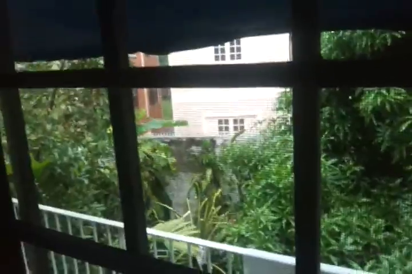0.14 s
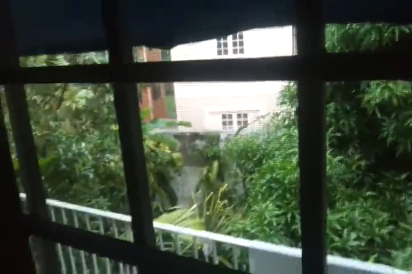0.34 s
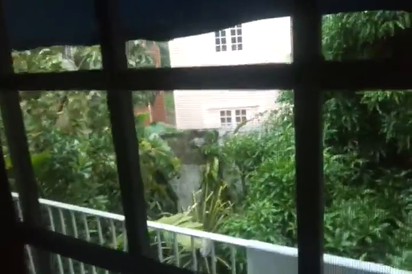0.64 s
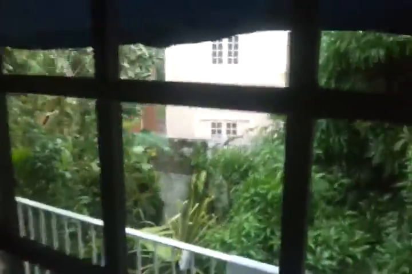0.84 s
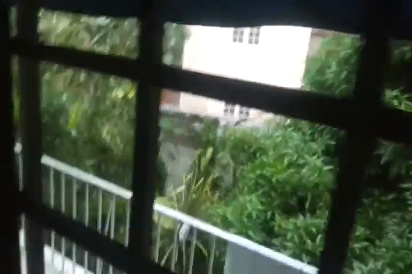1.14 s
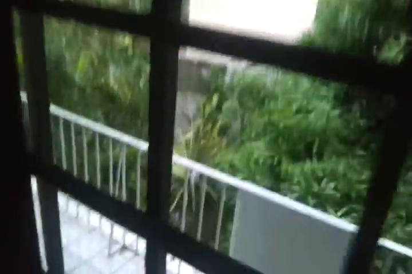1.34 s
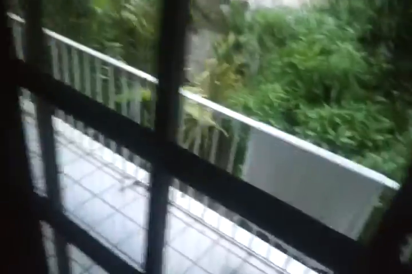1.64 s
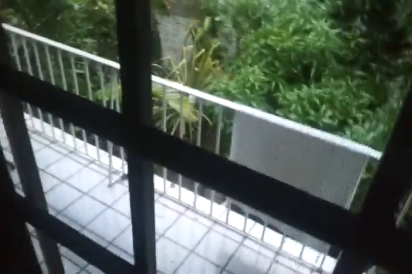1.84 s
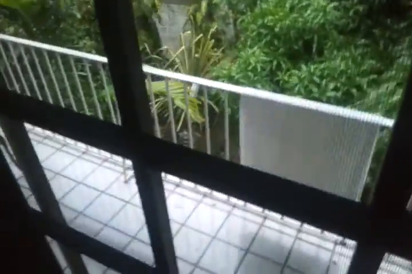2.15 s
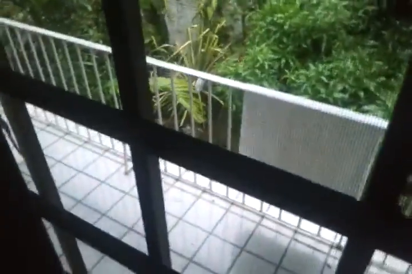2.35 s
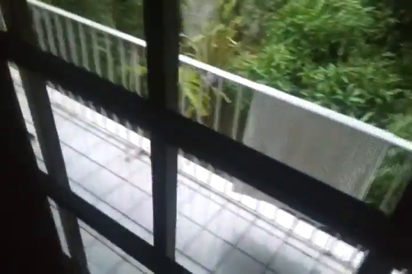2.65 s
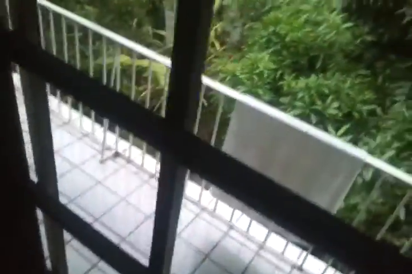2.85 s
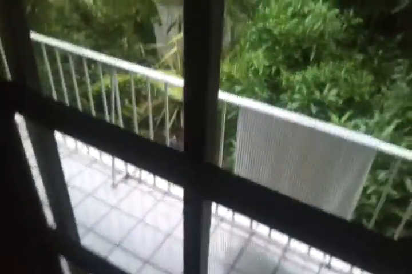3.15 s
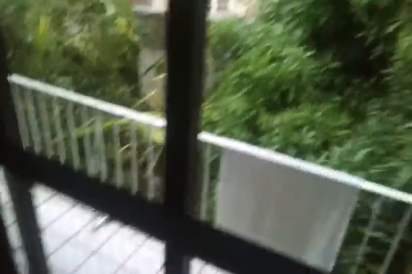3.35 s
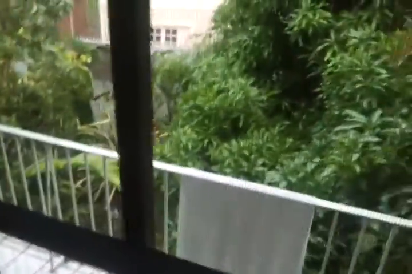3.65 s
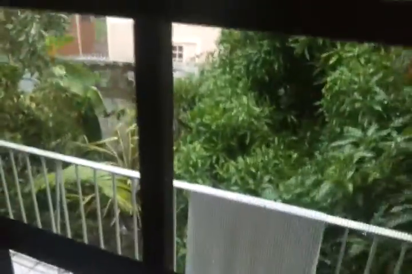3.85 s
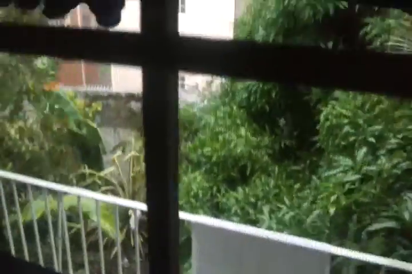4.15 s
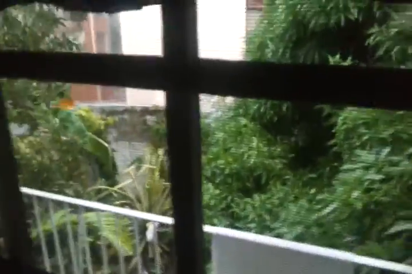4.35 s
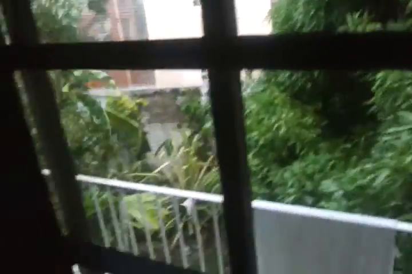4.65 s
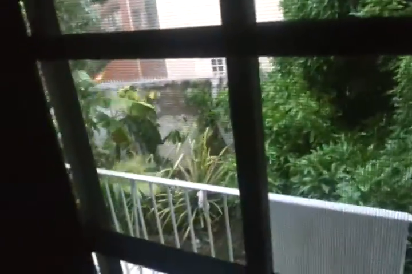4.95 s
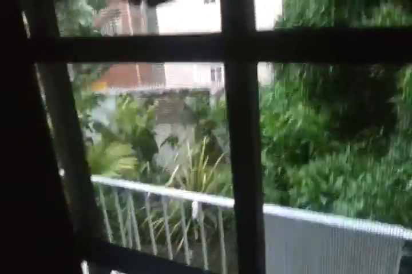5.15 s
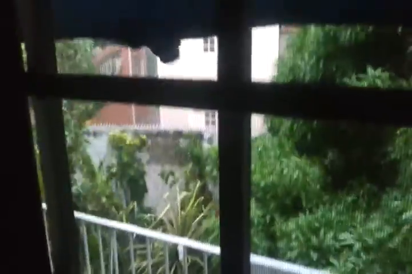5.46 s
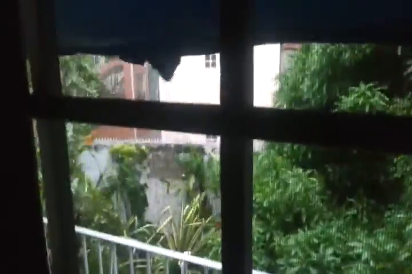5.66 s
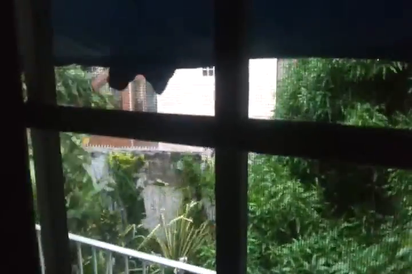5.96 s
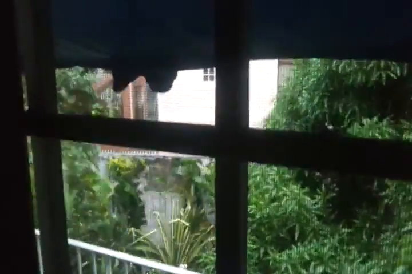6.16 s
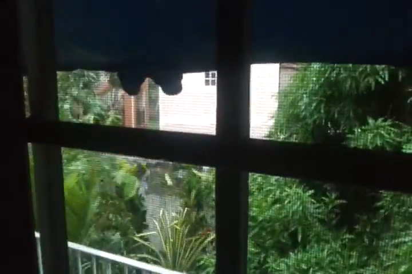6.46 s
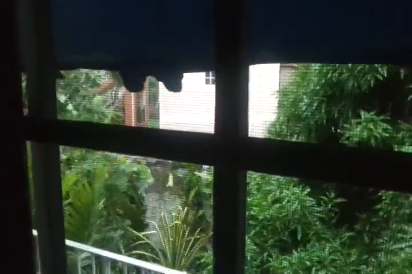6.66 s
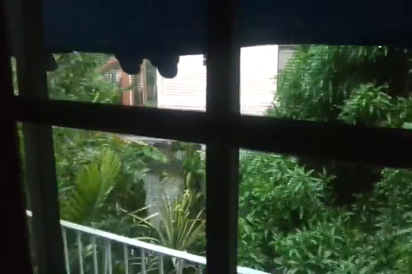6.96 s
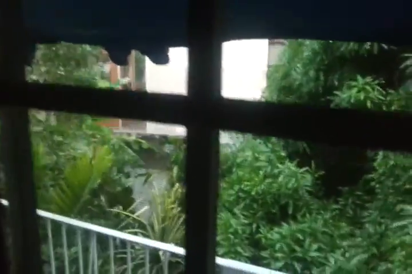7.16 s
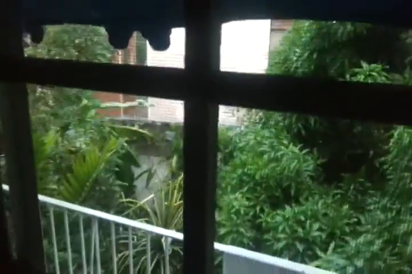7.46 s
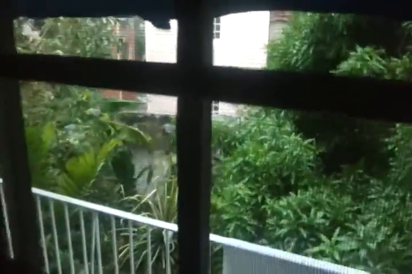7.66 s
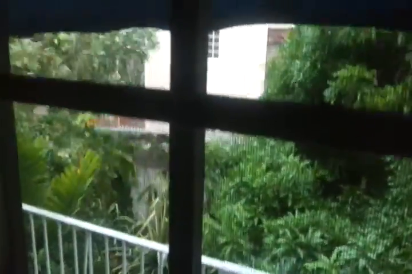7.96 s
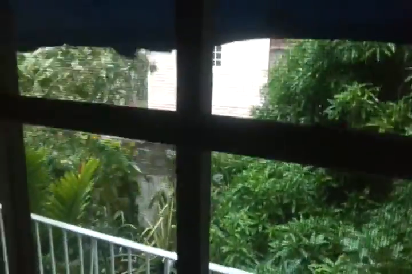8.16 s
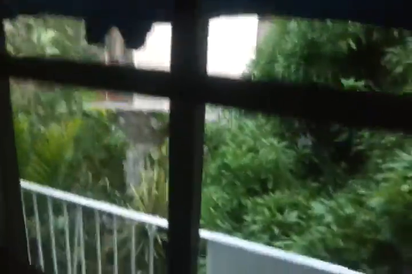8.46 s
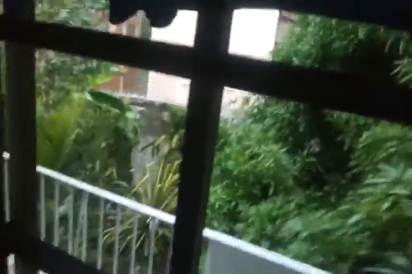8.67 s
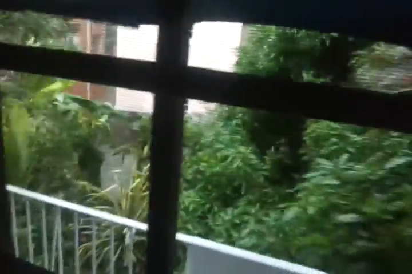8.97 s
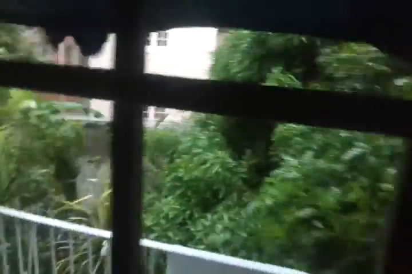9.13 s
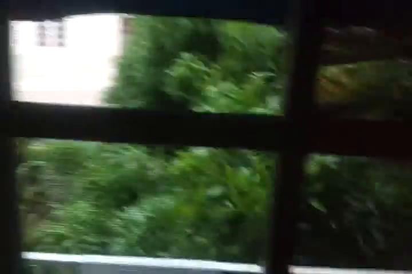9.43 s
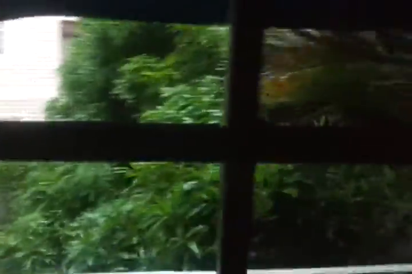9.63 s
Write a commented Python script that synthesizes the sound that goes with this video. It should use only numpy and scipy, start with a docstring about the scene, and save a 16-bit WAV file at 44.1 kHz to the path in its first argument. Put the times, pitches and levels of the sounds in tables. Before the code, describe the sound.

A rainstorm rushes loudly in the trees, swelling and ebbing as low wind buffets hit the microphone and briefly overload it.

```python
"""A storm heard through a barred window: wind roars in the trees and drives hissing sheets of rain.
About 1 s in, the first gusts thud on the microphone; it tilts down to the balcony, and nearby
reflections recolour the rush. The storm swells to a peak after 4 s and ebbs. Around 6 s the hardest
gusts buffet the microphone into overload; the storm rises again and more buffets follow near 8.6 s.
At the end the microphone swings back and the opening colour returns."""
import sys
import numpy as np
from scipy import signal
from scipy.io import wavfile
from scipy.ndimage import uniform_filter1d

SR = 44100
rng = np.random.default_rng(int(sys.argv[2]) if len(sys.argv) > 2 else 0)


def output_pcm(signal):
    """Save a mono or channel-first signal as 16-bit PCM at the path in sys.argv[1].

    Samples are clipped to [-1, 1] before scaling.
    """
    pcm = np.clip(np.atleast_2d(signal).T, -1, 1) * 32767
    wavfile.write(sys.argv[1], SR, np.round(pcm).astype(np.int16))


N = 432180
HOP = 256  # samples between short-time spectra

# Strength of the storm in the trees and the rain: time_s, roar_db, hiss_db
STORM_LEVELS = [(0.05, -31.5, -25.5), (0.18, -30, -24), (0.86, -30.5, -24), (1.21, -32, -27),
                (1.97, -29.5, -23.5), (2.64, -30.5, -24), (2.97, -26.5, -20.5), (3.83, -26.5, -20.5),
                (4.26, -22, -18), (4.53, -25.5, -18), (6.07, -33.5, -28), (6.15, -31.5, -27.5),
                (6.59, -32, -25), (7.58, -26.5, -20), (8.07, -29.5, -24), (8.56, -27, -23),
                (9.18, -26, -19.5), (9.75, -29, -23)]


def gain_of(db):
    """Amplitude ratio of a level in decibels."""
    return 10 ** (np.asarray(db) / 20)


def unit_rms(x):
    """Normalisation to an rms of 1."""
    return x / np.sqrt(np.mean(x ** 2) + 1e-20)


def spectrum_db(points, hz):
    """Interpolation of a spectrum on a logarithmic frequency axis."""
    points_hz, db = np.transpose(points)
    return np.interp(np.log(hz + 1), np.log(points_hz + 1), db)


def follow(table, t):
    """Linear interpolation of a table's columns at the times t."""
    time_s, *columns = np.transpose(table)
    return [np.interp(t, time_s, column) for column in columns]


def add(mix, start_s, sound):
    """Superposition of a sound on the mix."""
    part = mix[max(round(start_s * SR), 0):][:len(sound)]
    part += sound[:len(part)]


def low_pass(x, hz):
    """Steep band limiting by a windowed-sinc filter."""
    return signal.oaconvolve(x, signal.firwin(601, hz, window=("kaiser", 9), fs=SR), "same")


def grid():
    """Times (a column) and frequencies (a row) of the short-time spectra."""
    return np.arange(N // HOP + 5)[:, None] * HOP / SR, np.fft.rfftfreq(4 * HOP, 1 / SR)


def turbulent_noise(colour_db, level_db, band_hz, patchy_db):
    """Random-phase noise with drifting patches; level_db sets its level within band_hz."""
    t, hz = grid()
    real, imaginary, patches = rng.standard_normal((3, len(t), len(hz)))
    patches = uniform_filter1d(patches, size=16, axis=0)
    patches = unit_rms(uniform_filter1d(patches, size=10, axis=1))
    shape = gain_of(colour_db) * np.ones_like(t)
    in_band = (hz >= band_hz[0]) & (hz <= band_hz[1])
    shape /= np.sqrt((shape[:, in_band] ** 2).sum(axis=1, keepdims=True))
    spectra = (real + 1j * imaginary) * shape * gain_of(level_db + patchy_db * patches)
    return np.sqrt(3 / 2) * signal.istft(spectra.T, nperseg=4 * HOP, noverlap=3 * HOP)[1][:N]


def reflections_db(t, hz):
    """Interference: nearby reflections lift and cancel bands that slide as the microphone turns."""
    # Effect of the microphone's direction on the bands: time_s, frequency_ratio, strength_ratio
    facing = [(0, 0.98, 1), (.85, 0.97, 1), (1.15, 0.86, 0.6), (1.4, 0.63, 0.2), (2.6, 0.62, 0.5),
              (3.3, 0.69, 0.2), (3.9, 0.79, 0.1), (9.35, 0.95, 0.06), (9.65, 0.94, 0.84), (9.8, 0.99, 1)]
    # Interference peaks and dips: centre_hz, width_hz, gain_db
    bands = [(610, 140, 3), (1050, 220, -1.5), (2000, 265, 6), (2860, 270, -2.5), (5400, 520, 4.5)]
    shift, strength = follow(facing, t)
    return strength * sum(db * np.exp(-((hz / shift - centre) / width) ** 2 / 2)
                          for centre, width, db in bands)


def trees():
    """Turbulent flow through foliage radiates a broadband roar."""
    # Spectrum of the roar: frequency_hz, relative_density_db
    roar_spectrum = [(20, -19), (70, -5.5), (180, 4), (270, -0.5), (380, 3.5), (520, -3.5), (660, -2.5),
                     (820, 0.9), (1200, -0.7), (1550, 0), (2100, -6.5), (3000, -12), (5000, -20.5),
                     (8000, -49)]
    t, hz = grid()
    roar_db, _ = follow(STORM_LEVELS, t)
    colour_db = spectrum_db(roar_spectrum, hz) + reflections_db(t, hz)
    return turbulent_noise(colour_db, roar_db, band_hz=(800, 1700), patchy_db=0.46)


def far_rain():
    """Incoherent summation: countless far impacts on thrashing leaves merge into a hiss."""
    # Spectrum of the hiss: frequency_hz, relative_density_db
    hiss_spectrum = [(300, -25), (1900, -16), (2400, -10), (2900, -7), (3480, -3.5), (3680, -5),
                     (4050, -1.5), (4340, 0), (5000, -3), (5650, -8), (6300, -14), (6900, -21.5),
                     (7400, -30.5), (7700, -47.5)]
    t, hz = grid()
    _, hiss_db = follow(STORM_LEVELS, t)
    colour_db = spectrum_db(hiss_spectrum, hz) + reflections_db(t, hz)
    return turbulent_noise(colour_db, hiss_db, band_hz=(3000, 7000), patchy_db=0.4)


def near_drops(drops_per_s=500, share_db=-14, spread_db=3, ring_s=0.0009, pitch_count=24):
    """Impact excitation: each drop on the tiles or railing starts a brief damped oscillation."""
    t = np.arange(256) / SR
    when, which, size = rng.random((int(drops_per_s * N / SR), 3)).T
    pitch_hz = np.geomspace(2600, 5600, pitch_count)[(which * pitch_count).astype(int)]
    amplitudes = gain_of(spread_db * np.minimum(-np.log(1 - size), 4))
    ticks = amplitudes[:, None] * np.exp(-t / ring_s) * np.sin(2 * np.pi * pitch_hz[:, None] * t)
    places = (when * N).astype(int)[:, None] + np.arange(len(t))
    patter = np.bincount(places.ravel(), ticks.ravel(), N)[:N]
    _, hiss_db = follow(STORM_LEVELS, np.arange(N) / SR)
    return unit_rms(patter) * gain_of(hiss_db + share_db)


def gusts_db(t, rise_s=0.028, fall_s=0.03):
    """Gusts rise exponentially, hold and decay; where they overlap their powers add."""
    # Gusts that reach the microphone: start_s, length_s, level_db
    gusts = [(0.77, 0.36, -25.5), (1.258, 0.094, -22.5), (2.7, 0.6, -29), (4.139, 0.07, -19.5),
             (4.28, 0.11, -24), (4.663, 0.28, -28), (5.917, 0.18, -14), (6.141, 0.06, -13),
             (6.25, 0.16, -16), (6.484, 0.065, -19), (6.632, 0.092, -16), (6.818, 0.21, -20),
             (7.13, 0.11, -21), (8.16, 0.065, -24), (8.54, 0.37, -20), (8.645, 0.055, -12),
             (9.3, 0.22, -28.5)]
    power = 1e-9
    for start_s, length_s, db in gusts:
        before = np.maximum(start_s - t, 0) / rise_s
        after = np.maximum(t - start_s - length_s, 0) / fall_s
        power += (gain_of(db) * np.exp(-before - after)) ** 2
    return 10 * np.log10(power)


def airflow(t, draught_db=-32.5, lull_db=-29, calm_db=-32, hard_db=-13.5):
    """Power sum of the gusts and a draught that follows the trees: level in dB, air speed 0 to 1."""
    roar_db, _ = follow(STORM_LEVELS, t)
    light_db = draught_db + 0.93 * (roar_db - lull_db)
    level_db = 20 * np.log10(np.hypot(gain_of(light_db), gain_of(gusts_db(t))))
    return level_db, np.clip((level_db - calm_db) / (hard_db - calm_db), 0, 1)


def wind_rumble(trim_db=-1.5, brighten_db=0.5, knee_hz=200):
    """Eddy shedding at the microphone: faster air sheds smaller eddies, so the rumble reaches higher."""
    # Spectrum of the eddy pressure: frequency_hz, relative_density_db
    eddy_spectrum = [(10, -21), (25, -8.5), (50, -1.5), (90, 1), (170, -2.5), (260, -10), (400, -15.5),
                     (700, -32), (1500, -48), (4000, -79.5)]
    t, hz = grid()
    level_db, speed = airflow(t)
    octaves_up = np.log2(1 + (hz / knee_hz) ** 2) / 2
    colour_db = spectrum_db(eddy_spectrum, hz) + brighten_db * (speed - 0.5) * np.minimum(octaves_up, 2)
    return turbulent_noise(colour_db, level_db + trim_db, band_hz=(20, 250), patchy_db=2.0)


def eddy_pulse(time_s, level_db, pitch_hz, width_cycles=0.37, grit=0.29):
    """A large eddy's pressure shoves the diaphragm to and fro; fast air adds fine turbulence."""
    t = np.arange(-1024, 1024) / SR
    _, speed = airflow(time_s)
    swell = np.exp(-(t * pitch_hz / width_cycles) ** 2 / 2)
    shove = np.sin(2 * np.pi * (pitch_hz * t + rng.random()))
    eddy_band = signal.butter(2, [300, 750], "band", fs=SR, output="sos")
    small_eddies = unit_rms(signal.sosfilt(eddy_band, rng.standard_normal(len(t))))
    return time_s + t[0], gain_of(level_db) * swell * (shove + grit * speed ** 3 * small_eddies)


def buffets(trim_db=-1, flutters_per_s=22, flutter_hz=190, flutter_db=5, spread_db=3):
    """Intermittent turbulence: hard pressure pulses amid a random flutter that scales with the gusts."""
    # The hardest eddies to strike the diaphragm: time_s, level_db, pitch_hz
    hard_buffets = [(0.879, -10.5, 180), (1.261, -13, 228), (1.328, -11, 198), (4.21, -10.5, 240),
                    (5.963, -5.5, 300), (5.99, -6, 144), (6.023, -1.5, 230), (6.135, -2, 207),
                    (6.165, -1, 272), (6.178, -5, 231), (6.196, 0, 246), (6.251, -0.5, 200),
                    (6.276, -6, 350), (6.318, -6.5, 190), (6.344, -2, 202), (6.369, -2, 232),
                    (6.509, -5.5, 170), (6.682, -5, 106), (6.904, -3.5, 149), (7.018, -4.5, 207),
                    (8.567, -3, 198), (8.652, -2, 150), (8.674, -5, 210), (8.703, -1.5, 180),
                    (8.746, -5, 210), (8.784, -4, 260), (8.822, -4, 240)]
    thuds = np.zeros(N)
    for time_s, level_db, pitch_hz in hard_buffets:
        add(thuds, *eddy_pulse(time_s, level_db + trim_db, pitch_hz))
    for k, (late, size, detune) in enumerate(rng.uniform(-1, 1, (int(flutters_per_s * N / SR), 3))):
        time_s = (k + 1 + late / 2) / flutters_per_s
        level_db = gusts_db(time_s) + flutter_db + spread_db * size
        add(thuds, *eddy_pulse(time_s, level_db, flutter_hz * 2 ** (0.55 * detune)))
    return thuds


def scene():
    """Superposition of the storm outside and the wind on the microphone."""
    return (trees() + far_rain() + near_drops() + wind_rumble() + buffets())[None]


def record(dry):
    """Saturation: a narrow-band microphone flattens the hardest buffets with a faint crackle."""
    full_scale, hardness = 0.71, 24
    narrow = low_pass(dry[0], hz=7600)
    flattened = narrow / (1 + (narrow / full_scale) ** hardness) ** (1 / hardness)
    return low_pass(flattened, hz=15800)[None]


dry = scene()
out = record(dry)
output_pcm(out)
```